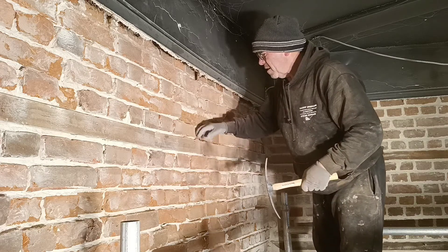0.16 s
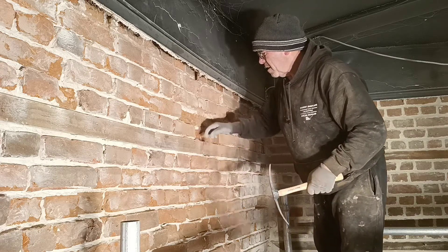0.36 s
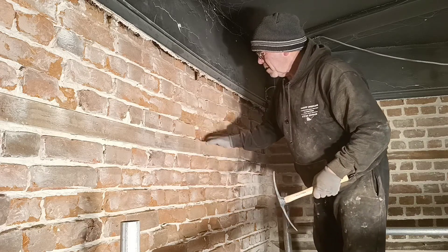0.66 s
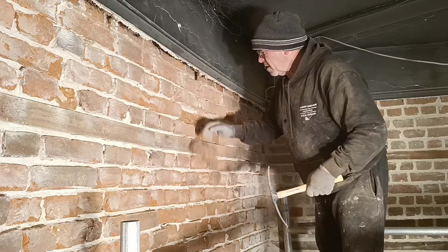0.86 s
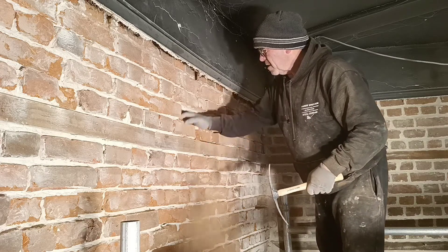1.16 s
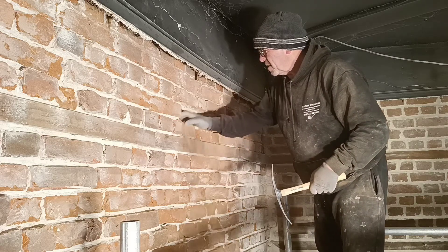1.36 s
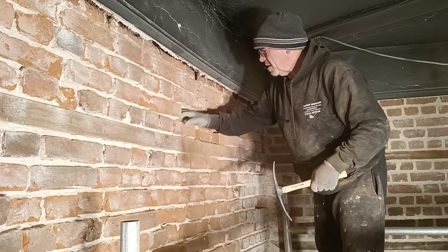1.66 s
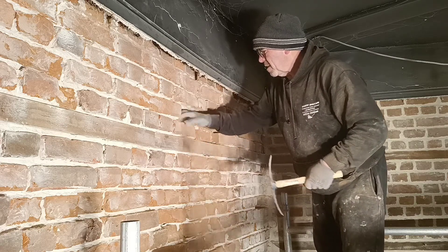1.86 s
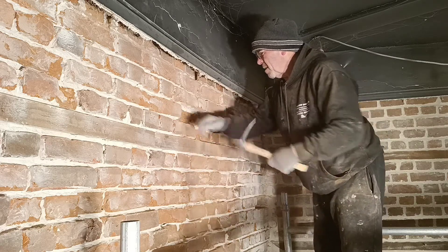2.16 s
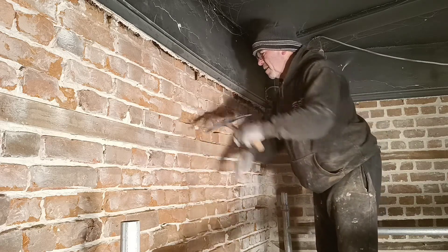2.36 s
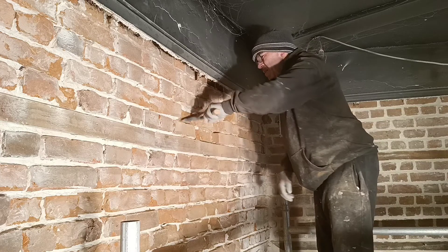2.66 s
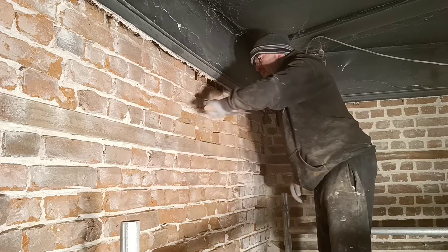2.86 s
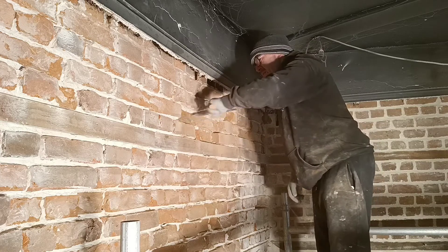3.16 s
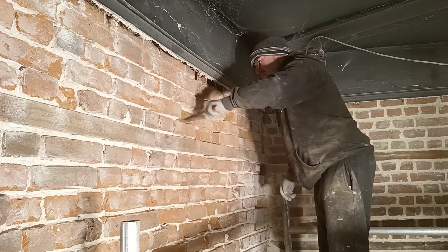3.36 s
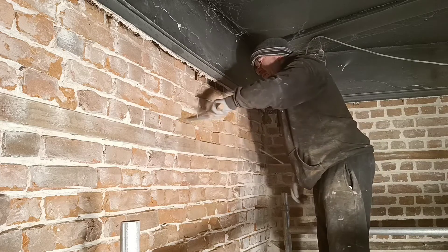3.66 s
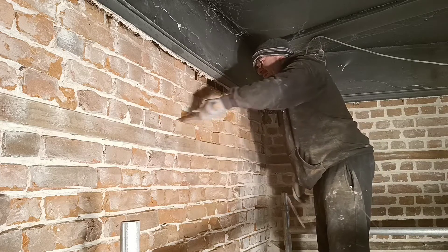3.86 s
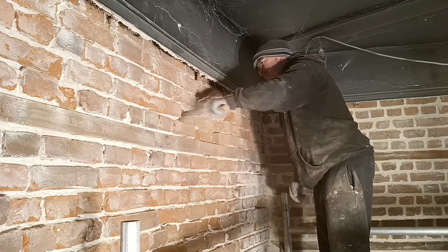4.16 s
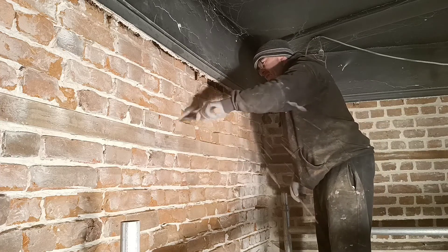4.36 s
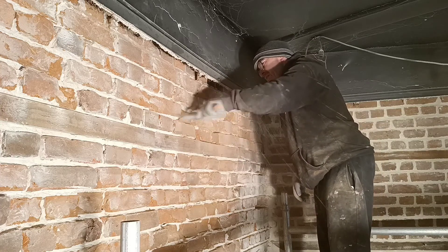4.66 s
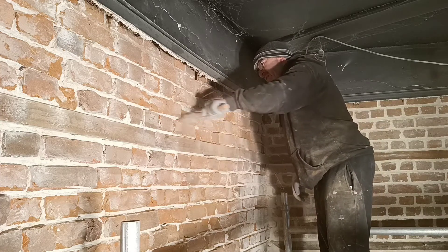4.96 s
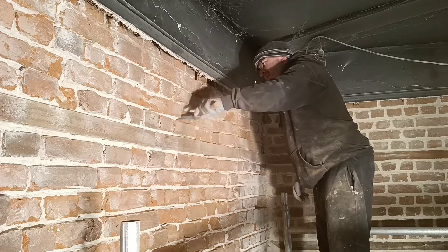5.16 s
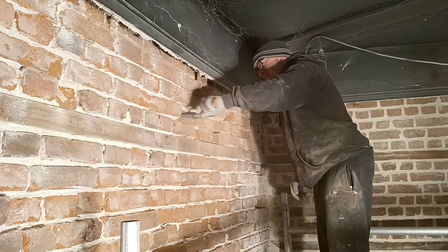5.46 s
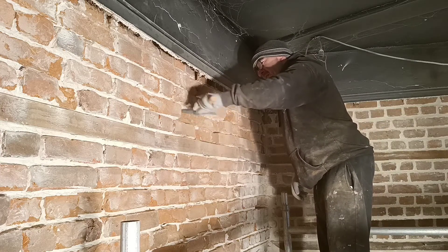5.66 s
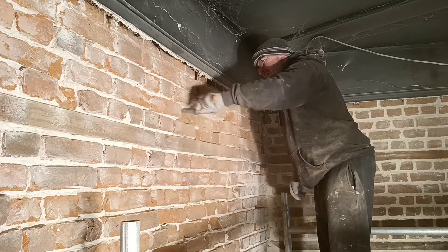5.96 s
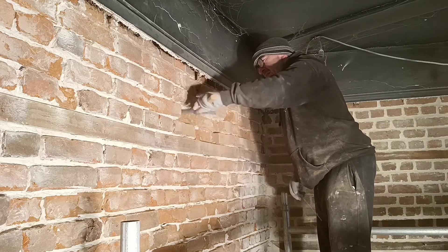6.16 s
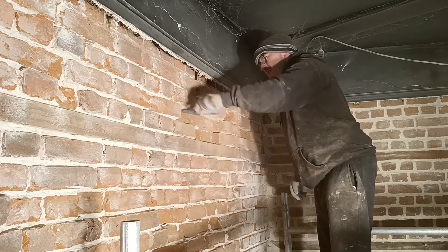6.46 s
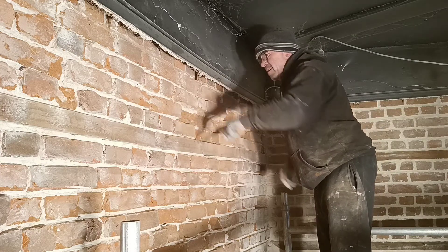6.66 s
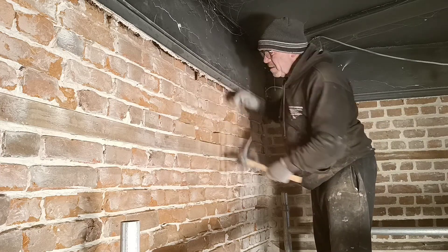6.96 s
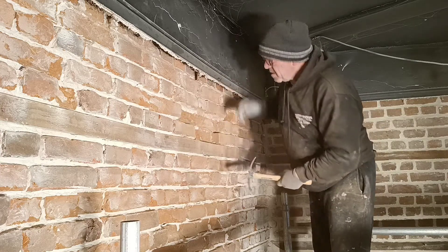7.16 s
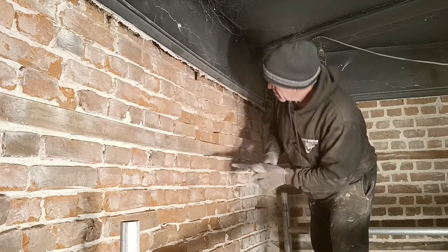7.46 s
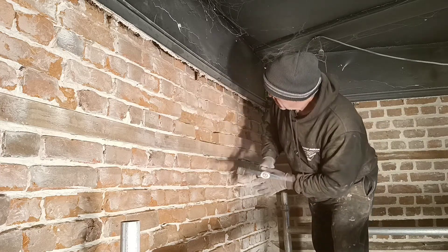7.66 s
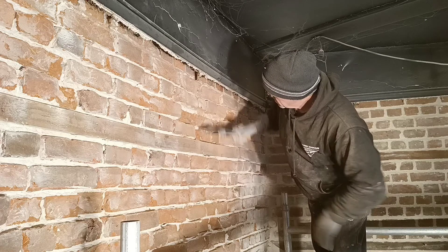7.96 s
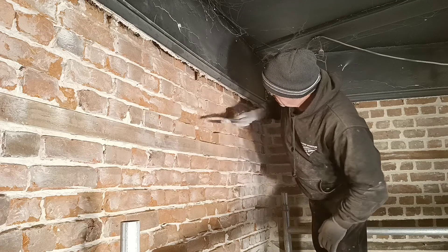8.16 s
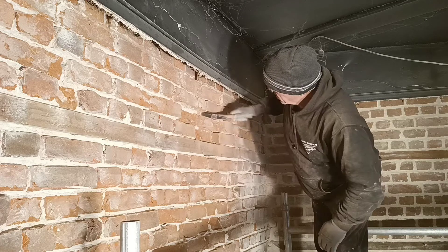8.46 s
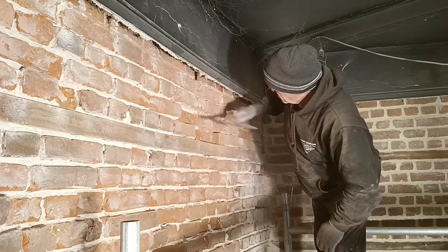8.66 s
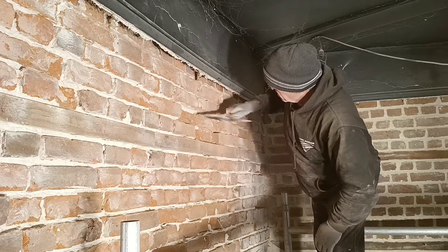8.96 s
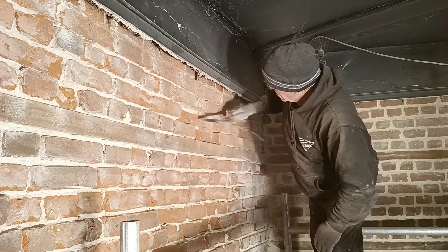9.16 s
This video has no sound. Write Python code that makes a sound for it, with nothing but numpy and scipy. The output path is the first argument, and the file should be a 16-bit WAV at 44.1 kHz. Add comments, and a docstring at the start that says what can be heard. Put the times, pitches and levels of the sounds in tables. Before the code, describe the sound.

For the first two and a half seconds, broken brick crumbles and drops to the floor with clacks and hollow knocks, while fine grit trickles down the wall over a low rumble. A steel tool pings and clinks a little further off. From about 3 to 6.5 seconds, close to the microphone, a hammer drives a chisel into the wall in steady blows, nearly four a second. Each is dull and gritty, with crushing brick, a brief steel ring and a low thud from the wall; the last two ring more sharply. Small chips fall and occasional clinks sound between them. In the pause, a glove brushes loose grit at around 7.2 seconds, followed by a soft hollow knock. Three more blows land between about 8.5 and 9 seconds. Short echoes of a brick room and faint room tone lie behind everything.

```python
"""Broken brick crumbles and drops to the floor of a brick room, while a steel bar clinks further off.
A ping, clacks and hollow knocks ring briefly; fine grit trickles down the wall. From about three seconds,
close to the microphone, a hammer drives a chisel into the wall with dull, gritty blows: the tip crushes
brick, the steel rings, the wall booms. In a pause a glove brushes loose grit. Short echoes, a low rumble
and faint room tone lie behind it all, and the stereo microphone's gain control holds the loud hits down."""
import sys
import numpy as np
from scipy import signal
from scipy.fft import rfft, irfft
from scipy.io import wavfile
from scipy.ndimage import uniform_filter1d

SR = 44100
rng = np.random.default_rng(int(sys.argv[2]) if len(sys.argv) > 2 else 0)


def generate_wav(signal):
    """Clip the signal to [-1, 1] and save it as 16-bit WAV at the path in sys.argv[1]."""
    frames = np.transpose(np.atleast_2d(signal))
    scaled = np.clip(frames, -1, 1) * 32767
    pcm = np.round(scaled).astype(np.int16)
    wavfile.write(sys.argv[1], SR, pcm)


N = 410130

# hammer blows, close up: (time [s], weight [dB], body over weight [dB], bite of the tip [dB],
# shank ring [dB], wall boom [dB], dust over bite [dB])
BLOWS = [(2.9477, -32.5, 6, -33.5, -30, -27, -8.5), (3.2669, -25.5, 2, -43, -32.5, -25, -12),
         (3.569, -29, 5.5, -45.5, -48, -29, -1), (3.849, -28.5, 3, -34.5, -59, -24, -18),
         (4.123, -34.5, 7, -27.5, -48, -28, -35), (4.3941, -33, -12, -39.5, -48, -31, -2.5),
         (4.657, -30, 2, -31, -34.5, -22, -12), (4.917, -40, 7, -32, -36, -37, -5),
         (5.1827, -31, 7, -34.5, -35, -27, -44), (5.437, -26, 0, -33, -35, -26.5, -13),
         (5.704, -35.5, 1, -49, -43, -32.5, -15), (5.956, -23, -0.5, -49.5, -43.5, -26, -12),
         (6.2025, -26, 8, -23, -16, -28.5, -44), (6.455, -25.5, 5.5, -31, -22.5, -29.5, -36),
         (8.4525, -26, -4.5, -43.5, -52, -27.5, -3), (8.761, -20.5, -4.5, -29, -56, -38.5, -10),
         (9.039, -22, -4, -33, -65, -29, -14)]
# modes of the chisel, of its shank in a loose grip, and of the wall: (frequency [Hz], level [dB], t60 [s])
CHISEL_MODES = [(1202, -2.5, 0.039), (2450, -12.5, .04), (3210, 4.5, 0.03), (4360, 5, 0.019),
                (5330, 2, 0.048), (6670, -2, 0.034), (7870, -10.5, 0.053), (10020, -9.5, 0.033)]
SHANK_MODES = [(1937, 8, 0.032), (927, -11, 0.09)]
WALL_MODES = [(159, -12, 0.11), (263.4, -7, 0.1), (331, -11, 0.34)]
# steel bar, further off: (time [s], contact [dB], ring [dB], chatter [s], lift of the lowest modes [dB])
CLINKS = [(0.3013, -31, -47.5, 0.0066, 0.5), (0.493, -40, -44, 0.025, -8.5), (0.51, -33, -46, 0.012, -0.5),
          (0.5525, -9, -26.5, 0.021, 13), (0.775, -9, -32.5, 0.011, 7), (0.859, -34.5, -29.5, 0.0086, 6.5),
          (1.01, -37, -45, 0.0096, 7), (1.229, -13.5, -19.5, 0.04, -8.5), (1.83, -42, -44.5, .005, 1),
          (1.914, -19.5, -26.5, 0.0044, -8), (2.5899, -31, -23.5, 0.019, -14),
          (2.681, -40, -35.5, 0.01, -8), (3.42, -41, -58.5, 0.0055, -6), (4.292, -40.5, -54, 0.0034, -9),
          (4.341, -48, -47, 0.01, -6), (4.7528, -27.5, -35, 0.004, 6.5), (4.77, -19, -27, 0.0023, -0.5),
          (5.259, -28, -41, 0.02, -7), (5.887, -53.5, -52, 0.0072, -16), (6.351, -26.5, -48, 0.0075, 12),
          (8.879, -47.5, -53.5, 0.0038, -10)]
# bending modes of the bar: (frequency over BAR_HZ [ratio], level [dB], t60 [s])
BAR_MODES = [(0.972, -1.5, 0.4), (1.07, -9, 0.17), (1.85, -17, 0.19), (2.349, -15, 0.15),
             (2.819, 8.5, 0.042), (2.89, -17, 0.13), (2.98, 1.5, 0.034), (3.4, 5.5, 0.02), (5.31, 4, 0.024),
             (6.29, -6.5, 0.051), (8.421, -7.5, 0.032)]
# brick pieces breaking and landing: (time [s], knock [dB], pitch [Hz], dust over knock [dB])
PIECES = [(0.0502, -36.5, 1390, -70), (0.119, -41.5, 1740, -46), (0.648, -19.5, 1300, -19),
          (0.828, -10.5, 1300, -9.5), (0.86, -8.5, 1740, -25), (1.0062, -36.5, 1900, -21.5),
          (1.0926, -33, 1295, -30.5), (1.1561, -19, 1550, -28), (1.339, -19.5, 1900, -31.5),
          (1.487, -25.5, 2550, -13.5), (1.504, -13, 1150, -19.5), (1.521, -15, 1580, -21.5),
          (1.577, -16, 1550, -16), (1.661, -17, 826, -9), (1.6863, -5.5, 3100, -24),
          (1.732, -4.5, 3440, -24), (1.815, -26.5, 1060, -8.5), (1.977, -16, 3980, -12),
          (2.166, -30.5, 1106, -42), (2.183, -16, 925, -34), (2.2564, -25, 4230, -17.5),
          (2.3411, -22, 1140, -4.5), (2.406, -33.5, 2280, -29), (2.82, -46, 2560, -21),
          (3.71, -30, 1400, -27), (4.08, -36, 4400, -6), (4.103, -19, 3100, -12), (4.171, -47.5, 3480, 11),
          (4.615, -46, 1500, -5), (4.65, -23.5, 3200, -34), (4.893, -56.5, 4000, 22),
          (4.995, -36.5, 1020, -19), (5.4997, -40, 3700, -1.5), (5.602, -46.5, 3050, -24),
          (5.675, -46.5, 4100, -3), (6.624, -44.5, 3500, -20), (6.741, -56, 2460, -18),
          (6.821, -33, 1400, -26.5), (7.0178, -47.5, 2940, -28), (7.222, -35, 1700, -57),
          (7.288, -24, 2050, -55)]
# a glove brushing loose grit: (time [s], level [dB])
SCUFFS = [(7.2, -40), (7.29, -34)]
# a steel ping, brick clacks and hollow knocks: (time [s], level [dB], pitch [Hz], t60 [s])
SHORT_RINGS = [(0.304, -22.5, 3590, 0.057), (0.564, -30, 357, 0.67), (0.834, -24.5, 365, 0.3),
               (.84, -19.5, 565, 0.4), (1.348, -16, 248, 0.044), (1.493, -10.5, 1220, 0.042),
               (1.505, -3, 978, 0.028), (1.524, -9.5, 1123, 0.058), (2.032, -9, 1337, 0.03),
               (2.182, -21.5, 236, 0.31), (2.341, 1.5, 491, 0.045), (2.455, -35, 250, 0.3),
               (2.56, -35.5, 455, 0.64), (2.734, -21.5, 442, 0.06), (7.533, -37, 203.3, 0.27),
               (7.533, -48, 765, 0.25), (7.576, -30, 213, 0.05)]
# spectrum of breaking brick: (frequency [Hz], density [dB])
BRICK_SPECTRUM = [(24, -23.5), (40, -26.5), (96, 3), (151, -2.5), (256, 7.5), (467, 4.5), (1810, 7),
                  (4570, -4.5), (5180, -2.5), (7930, -21), (9690, -13.5), (13500, -26.5), (15500, -25.5)]
# the knock, thud, body, crack and fizz bands of a crunch: (low edge [Hz], high edge [Hz])
CRUNCH_BANDS = [(1200, 3500), (130, 350), (350, 1200), (3500, 7500), (7500, 16000)]
# fine grit running down the wall: (time [s], level [dB])
TRICKLE_LEVEL = [(0, -50), (.44, -59), (.6, -38.5), (1.45, -40.5), (1.6, -29), (2.1, -43), (2.3, -34.5),
                 (2.57, -43), (2.8, -54.5), (3.3, -55.5), (5, -52.5), (6.1, -56.5), (7.17, -58),
                 (7.24, -57.5), (7.43, -51), (7.5, -59.5), (7.798, -69.5)]
# rumble while debris falls and a hand rubs the wall: (time [s], level [dB])
RUMBLE_LEVEL = [(.55, -80.5), (.9, -51), (1.899, -59), (2.3, -41), (2.7, -57.5), (2.85, -81), (7.1, -71),
                (7.3, -59), (7.449, -51), (7.55, -79)]
# decay of the brick room: (frequency [Hz], t60 [s])
ROOM_DECAY = [(60, 0.24), (400, 0.31), (1500, 0.24), (5000, 0.27), (16000, 0.15)]
# likeness of the echoes left and right: (frequency [Hz], coherence [0 to 1])
ECHO_COHERENCE = [(100, 1), (300, 0.59), (700, 0.057), (2300, 0.017)]
# spectrum of the room tone: (frequency [Hz], density [dB])
ROOM_TONE_SPECTRUM = [(18, -28.5), (30, -26.5), (75, 2), (98, -10.5), (179, -7), (4300, -25.5),
                      (8080, -68.5), (16000, -56)]
# unlike colour of the two microphone ports: (frequency [Hz], left minus right [dB])
PORT_BALANCE = [(60, 9), (240, 2.5), (1000, 5.5), (9000, 5), (11300, -4), (13000, -17), (15500, -13.5)]

HIT_SAMPLES = 8192
BAR_HZ = 1846  # the bar's lowest bending modes lie around this pitch
BOOM_HZ, BOOM_T60_S = 93.8, 0.098  # lowest mode of the wall, strong or weak by where it is struck


def chisel_blows():
    """Close to the microphone the chisel tip crushes brick, the steel rings and the wall booms."""
    out = np.zeros(N)
    for s, weight_db, body_db, bite_db, shank_db, boom_db, dust_db in BLOWS:
        knock_db = (weight_db + body_db + bite_db) / 2 + 0.5
        bands_db = [knock_db, weight_db, weight_db + body_db, bite_db, bite_db + dust_db]
        add(out, s, crunch(bands_db, decay_s=0.0086, rise_s=0.0048, grain_db=1.5))
        # the chisel sits differently each time, which shifts its modes
        seated = [(hz * (1 + 0.015 * rng.standard_normal()), db, t60) for hz, db, t60 in CHISEL_MODES]
        steel = gain_of(bite_db - 2.5) * ring(seated) + gain_of(shank_db) * ring(SHANK_MODES)
        add(out, s + 0.0034, steel)
        wall = gain_of(weight_db - 7.5) * ring(WALL_MODES) + ring([(BOOM_HZ, boom_db - 7, BOOM_T60_S)])
        add(out, s + 0.00408, wall)  # the heavy wall answers a little later
    return out


def bar_clinks():
    """Further off, a free steel bar rings and rattles on brick after a gritty contact with little bass."""
    out = np.zeros(N)
    swell = onset(rise_s=0.00047)  # the ring sets in almost at once, with a slightly softened attack
    for s, contact_db, ring_db, chatter_s, low_db in CLINKS:
        body_db = contact_db - 21.5
        bands_db = [contact_db - 4, body_db - 30.5, body_db, contact_db, ring_db + 1.5]
        add(out, s, crunch(bands_db, decay_s=chatter_s, rise_s=0.0027, grain_db=0.5))
        modes = [(BAR_HZ * ratio, db + low_db * (ratio < 1.2), t60) for ratio, db, t60 in BAR_MODES]
        rattle = unit_rms(flutter(HIT_SAMPLES, spread_db=3, window=150))
        add(out, s, gain_of(ring_db) * ring(modes) * swell * rattle)
    return out


def rubble():
    """Loose brick crunches as pieces break and land, and more slowly as a glove brushes over it."""
    out = np.zeros(N)
    for s, knock_db, hz, dust_db in PIECES:
        # light, high pieces have less body; high or dusty ones crack more
        octaves = np.log2(hz / 1000)
        body_db = 1.31 * knock_db + 3.5 - 6.5 * octaves
        crack_db = knock_db + 2.5 + 4.5 * octaves + 0.5 * dust_db
        bands_db = [knock_db, body_db - 13, body_db, crack_db, knock_db + dust_db]
        add(out, s, crunch(bands_db, decay_s=0.012, rise_s=0.0037, grain_db=4.5, piece_hz=hz))
    for s, db in SCUFFS:
        bands_db = [db, db - 9, db - 7, db - 13, db - 42]
        add(out, s, crunch(bands_db, decay_s=0.081, rise_s=0.035, grain_db=1))
    return signal.sosfilt(signal.butter(2, 130, "high", fs=SR, output="sos"), out)


def short_rings():
    """Short two-tone rings, close and dry: a steel ping, brick clacks and hollow knocks."""
    out = np.zeros(N)
    for s, db, hz, t60 in SHORT_RINGS:
        modes = [(hz, 0, t60), (hz * 1.16, -4, t60)]
        add(out, s, gain_of(db) * ring(modes) * onset(rise_s=0.8 / hz))
    return out


def trickle(grains_per_s=600):
    """Scattered grains of uneven size tick on brick and floor."""
    sizes = gain_of(4.2 * np.minimum(rng.exponential(1, N), 4))
    grains = sizes * (rng.random(N) < grains_per_s / SR) * rng.standard_normal(N)
    hz = np.fft.rfftfreq(N, 1 / SR)
    bass_cut_db = 10 * np.log10(1 + (1300 / (hz + 1)) ** 4)  # too small for any bass
    ticks = coloured(grains, 0.72 * at_hz(BRICK_SPECTRUM, hz) - bass_cut_db)
    return unit_rms(ticks) * fader(TRICKLE_LEVEL)


def rumble():
    """Low noise in uneven lumps, as debris falls and a hand rubs the wall."""
    band = signal.butter(2, [70, 300], "band", fs=SR, output="sos")
    low = signal.sosfilt(band, rng.standard_normal(N))
    return unit_rms(low * flutter(N, spread_db=4.2, window=1300)) * fader(RUMBLE_LEVEL)


def room(x, drift_hz=1.1):
    """No two hits come from quite the same spot, so the sound drifts between two sets of echoes."""
    turn = 2 * np.pi * drift_hz * np.arange(N) / SR
    shares = np.cos(turn), np.sin(turn)
    return sum(signal.oaconvolve((x * share)[None], echoes(), axes=1)[:, :N] for share in shares)


def echoes(first_s=0.0037, size=SR // 2):
    """Sparse echoes off the brick, each band dying at its own speed, alike on both sides in the bass."""
    taps = np.zeros((2, size))
    slots = np.arange(round(first_s * SR), size - 20, 20)
    arrivals = slots + rng.integers(0, 20, (2, len(slots)))
    np.put_along_axis(taps, arrivals, rng.choice([-1., 1.], arrivals.shape), 1)
    hz, t, (left, unrelated) = signal.stft(taps, SR, nperseg=256)
    coherence = np.clip(at_hz(ECHO_COHERENCE, hz), 0, 1)[:, None]
    right = coherence * left + np.sqrt(1 - coherence ** 2) * unrelated
    bands = np.array([left, right]) * gain_of(-60 * t / at_hz(ROOM_DECAY, hz)[:, None])
    energy = uniform_filter1d((abs(bands) ** 2).sum(2), size=5, axis=1)
    tail = signal.istft(bands / np.sqrt(energy)[:, :, None], SR, nperseg=256)[1]
    return tail / np.linalg.norm(tail[0])


def room_tone():
    """The faint steady noise of the room, partly shared by left and right."""
    hz = np.fft.rfftfreq(N, 1 / SR)
    common, left, right = rng.standard_normal((3, N))
    noise = np.array([left, right]) + 0.5 * common
    return gain_of(-66.5) * unit_rms(coloured(noise, at_hz(ROOM_TONE_SPECTRUM, hz)))


def crunch(bands_db, decay_s, rise_s, grain_db, piece_hz=None):
    """Grit breaking: a snap and a burst of uneven grains, brick-coloured and bent to five band levels."""
    t, hz = np.arange(HIT_SAMPLES) / SR, np.fft.rfftfreq(HIT_SAMPLES, 1 / SR)
    white = rng.standard_normal(HIT_SAMPLES)
    grains = unit_rms(flutter(HIT_SAMPLES, spread_db=grain_db, window=60))
    chips = uniform_filter1d(rng.standard_normal(HIT_SAMPLES)[:len(hz)], size=40)
    chips_db = 2 * unit_rms(uniform_filter1d(chips, size=40))  # many small chips resonate
    colour_db = at_hz(BRICK_SPECTRUM, hz) + chips_db
    if piece_hz:
        colour_db += 8 / (1 + ((hz / piece_hz - 1) / 0.16) ** 2)  # the largest piece clacks at its pitch
    power = gain_of(2 * colour_db)
    bend = [(np.sqrt(lo * hi), db - 10 * np.log10(power[(hz > lo) & (hz < hi)].sum()))
            for (lo, hi), db in zip(CRUNCH_BANDS, bands_db)]
    noise = coloured(white, colour_db + at_hz(sorted(bend), hz)) * np.sqrt(HIT_SAMPLES / 2)
    snap = 2.01 * (t / rise_s * np.exp(1 - t / rise_s)) ** 2
    burst = onset(rise_s) * np.exp(-t / decay_s)
    return noise * grains * (snap + burst)


def ring(modes):
    """A struck body: dying sines in close pairs that beat, each pair set off with a chance strength."""
    t, out = np.arange(HIT_SAMPLES) / SR, 0
    for hz, db, t60 in modes:
        strength, beat = rng.standard_normal(2)
        pair = np.sin(2 * np.pi * hz * t) + 2.07 * np.sin(2 * np.pi * hz * (1 + 0.013 * beat) * t)
        out = out + gain_of(db + 1.65 * strength - 60 * t / t60) * pair
    return out * np.cos(np.pi / 2 * t * SR / HIT_SAMPLES)  # the ring fades smoothly to silence


def flutter(size, spread_db, window):
    """A gain that wavers at random, smoothed over a window of samples."""
    return gain_of(spread_db * unit_rms(uniform_filter1d(rng.standard_normal(size), size=window)))


def onset(rise_s):
    return 1 - np.exp(-np.arange(HIT_SAMPLES) / SR / rise_s)


def fader(points):
    return gain_of(np.interp(np.arange(N) / SR, *np.transpose(points)))


def at_hz(points, hz):
    knots_hz, values = np.transpose(points)
    return np.interp(np.log(hz + 1), np.log(knots_hz + 1), values)


def coloured(x, db):
    return irfft(rfft(x) * gain_of(db), x.shape[-1])


def gain_of(db):
    return 10 ** (np.asarray(db) / 20)


def unit_rms(x):
    return x / np.sqrt(np.mean(x ** 2) + 1e-20)


def add(mix, s, sound):
    part = mix[round(s * SR):][:len(sound)]
    part += sound[:len(part)]


def scene():
    """From the microphone's place: the near chisel is mostly direct, the distant bar mostly room."""
    chisel, bar, grit = chisel_blows(), bar_clinks(), trickle()
    brick, rings = rubble(), short_rings()
    direct = gain_of(2) * chisel + gain_of(-8) * bar + gain_of(-7) * (brick + rings + grit)
    near_echoes = room(gain_of(-5) * chisel + gain_of(-5.5) * brick + gain_of(-16.5) * rings)
    far_echoes = room(bar + gain_of(-1.5) * grit)
    return direct + near_echoes + far_echoes + rumble() + room_tone()


def record(dry, threshold_db=-33, release_db_per_s=550, left_lag_samples=38, ceiling=0.7):
    """A camera's stereo microphone: gain control, low cut, two unlike ports, preamp and top cut."""
    power_db = 10 * np.log10(abs(uniform_filter1d((dry ** 2).mean(0), size=200)) + 1e-12)
    fall_db = np.arange(N) * release_db_per_s / SR
    peak_db = np.maximum.accumulate(power_db + fall_db) - fall_db
    over_db = np.maximum(peak_db - threshold_db, 0)
    held = dry / gain_of(0.47 * uniform_filter1d(over_db, size=150))  # loud hits are held down
    held = signal.sosfilt(signal.butter(3, 58, "high", fs=SR, output="sos"), held)
    lean_db = at_hz(PORT_BALANCE, np.fft.rfftfreq(N, 1 / SR)) / 2
    left, right = coloured(held, np.array([lean_db, -lean_db]))
    left = np.r_[np.zeros(left_lag_samples), left[:-left_lag_samples]]  # sound reaches this port later
    rounded = ceiling * np.tanh(np.array([left, right]) / ceiling)  # the preamp rounds off peaks
    top_cut = signal.firwin(511, 15900, window=("kaiser", 9), fs=SR)
    return signal.oaconvolve(rounded, top_cut[None], "same")


dry = scene()
out = record(dry)
generate_wav(out)
```